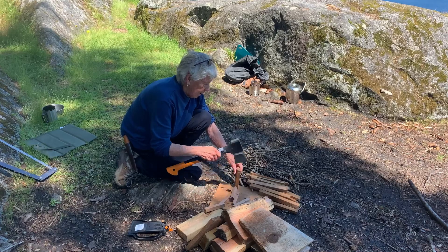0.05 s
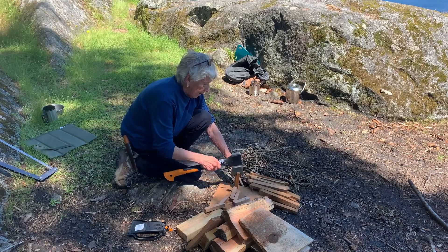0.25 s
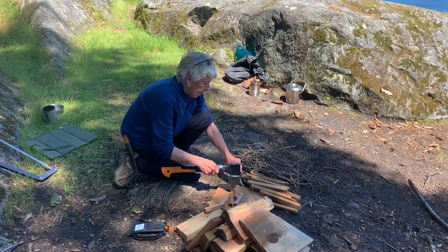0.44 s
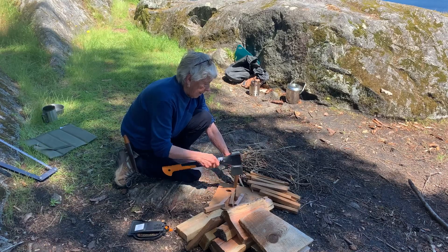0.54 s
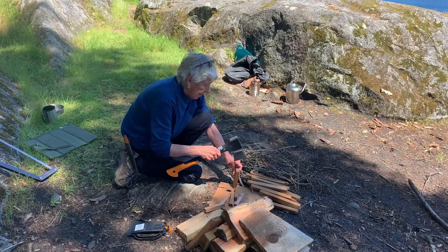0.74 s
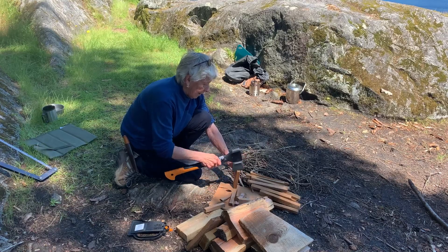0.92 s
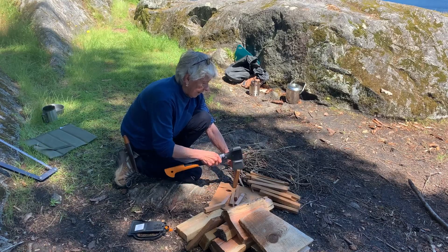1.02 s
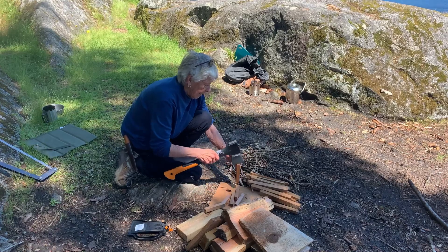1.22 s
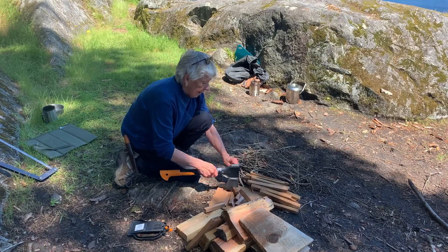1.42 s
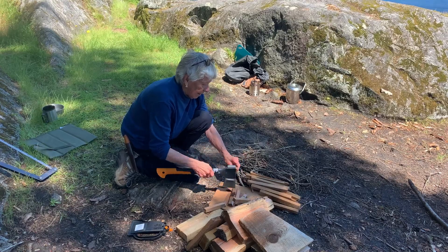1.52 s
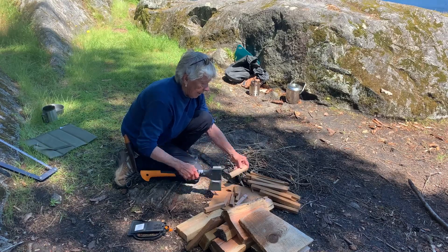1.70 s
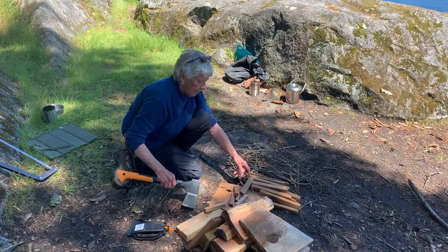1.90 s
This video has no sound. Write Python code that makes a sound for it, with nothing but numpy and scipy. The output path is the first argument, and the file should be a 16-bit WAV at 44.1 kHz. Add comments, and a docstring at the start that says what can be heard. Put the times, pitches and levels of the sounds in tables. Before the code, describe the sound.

Close stereo pickup of hatchet chops on dry sticks outdoors, stronger on the left. Hard woody clacks with short low ground thuds, a faint steel ring, light stick rattles, slight scattered echoes and a low far hum.

```python
"""Hatchet in dry kindling

A hatchet is tapped into dry kindling three times outdoors, close to two microphone ports. Split sticks
crack, bounce and clack on the wood pile: damped modes driven by rough contact noise, with treble snaps.
Each blow adds a falling thud through the ground, a rattle of small clacks and scattered echoes; steel
rings as a decaying sine. A far engine drones as low harmonics under quiet air made of shaped noise."""
import sys
import numpy as np
from scipy import signal
from scipy.fft import rfft, irfft
from scipy.io import wavfile
from scipy.ndimage import uniform_filter1d

SR = 44100
rng = np.random.default_rng(int(sys.argv[2]) if len(sys.argv) > 2 else 0)


def waveform_to_disk(signal):
    """Save audio, clipped to [-1, 1], as 16-bit WAV at the path in sys.argv[1]."""
    frames = np.transpose(np.atleast_2d(signal))
    scaled = np.clip(frames, -1, 1) * 32767
    samples = np.round(scaled).astype(np.int16)
    wavfile.write(sys.argv[1], SR, samples)


def how_loud(loudness_db):
    """Turn decibels into a plain amplitude multiplier (0 dB gives 1, 20 dB gives 10)."""
    steps = np.asarray(loudness_db, float) / 20
    return 10 ** steps


N = 85995


def evened(x):
    """Normalisation of power: scales to unit rms."""
    return x / np.sqrt(np.mean(x ** 2) + 1e-20)


def peaked(x):
    """Normalisation of amplitude: scales to unit peak."""
    return x / (abs(x).max() + 1e-20)


def read(points, hz):
    """Logarithmic frequency scale: interpolates a table along it."""
    f, value = np.transpose(points)
    return np.interp(np.log(hz + 1), np.log(f + 1), value)


def add(mix, s, sound):
    """Superposition: sums a sound into the mix from a time in seconds."""
    part = mix[round(s * SR):][:len(sound)]
    part += sound[:len(part)]


def coloured(x, points):
    """Linear filtering: multiplies the spectrum by a gain table in dB."""
    return irfft(rfft(x) * how_loud(read(points, np.fft.rfftfreq(len(x), 1 / SR))), len(x))


def hatchet():
    """Impact excitation: a blow sets off a blade clack, ground thud, crack, splinter spray and rattle."""
    # hatchet blows, levels ahead of the ports: time_s, clack_level_db, pitch_hz, thud_level_db, crack_level_db
    chops = [(.215, -1.5, 1373, -9.5, -15.5), (0.8017, -7.5, 903, -13.5, -24.5),
             (1.2469, -1, 1447, -10, -13.5)]
    clack_s, crack_s, crack_after_s = 0.01, 0.01, 0.002
    spray_s, spray_db, spray_lump_db = 0.08, -18, 2  # splinters keep crackling after a blow
    held = 0.4  # a held stick rings this share as long
    out = np.zeros(N)
    for s, db, hz, thud_db, crack_db in chops:
        add(out, s, how_loud(db) * clack(hz, clack_s, held, 0.5))
        add(out, s, how_loud(thud_db) * thud())
        add(out, s + crack_after_s, how_loud(crack_db) * snap(crack_s))
        add(out, s + crack_after_s, how_loud(crack_db + spray_db) * snap(spray_s, spray_lump_db))
        rattle(out, s, db)
    return out


def rattle(out, s, blow_db):
    """Decaying impact train: loose wood adds small clacks at jittered times after a blow."""
    per_s, start_db, t60_s = 70, -36, 0.5
    for gap in np.arange(1, 20) / per_s:
        jitter, size, pitch = rng.random(3)
        late = gap + jitter / per_s
        level_db = blow_db + start_db - 60 * late / t60_s - 10 * size
        add(out, s + late, how_loud(level_db) * clack(800 + 1500 * pitch, 0.0039))


def sticks():
    """Contact excitation: every touch of stick on wood is a clack with some snap on top."""
    # hard clacks, tearing and sliding of split sticks, levels ahead of the ports:
    # time_s, level_db, pitch_hz, treble_db (relative to the clack), contact_s (bursts limit it to 0.08)
    cracks = [(.284, -16, 1270, -15.5, 0.012), (0.293, -10, 1450, -20.5, 0.012),
              (0.303, 1, 1693, -11, .011), (0.3111, -0.5, 1810, -12, 0.0061),
              (0.317, -13.5, 1130, -27.5, 0.0054), (0.345, -22, 1400, -36, 0.0015),
              (.953, -18.5, 1890, -23, 0.0054), (1.267, -26.5, 2710, 3, 0.0091),
              (1.311, -29, 1270, -9, 0.052), (1.332, -17, 1290, -23.5, 0.0049),
              (1.366, -15.5, 1293, -24.5, 0.0068), (1.873, -37, 1560, -8.5, 0.094),
              (1.893, -25.5, 1660, -28, 0.0046), (1.903, -16.5, 1556, -25.5, 0.0085),]
    # soft taps of stick on wood, levels ahead of the ports: time_s, level_db, pitch_hz, contact_s
    knocks = [(.009, -26, 1440, 0.0057), (0.051, -26, 1160, 0.017), (0.165, -26, 1110, 0.0054),
              (0.327, -25, 1290, 0.0063), (0.429, -25.5, 1070, 0.0026), (0.488, -21.5, 1310, 0.0028),
              (0.854, -31, 1070, 0.0019), (0.871, -25, 850, 0.0051), (0.888, -22.5, 1300, 0.0068),
              (0.909, -33, 840, 0.0029), (0.988, -32, 1050, 0.0099), (1.027, -23, 1293, 0.011),
              (1.053, -34, 1200, 0.011), (1.238, -36.5, 1270, 0.0074), (1.309, -21.5, 920, 0.004),
              (1.392, -20, 1037, 0.0047), (1.556, -32, 1490, 0.0049), (1.654, -21, 1080, 0.0027),
              (1.691, -24.5, 980, 0.0097), (1.911, -22.5, 1410, 0.0027), (1.921, -26.5, 1120, 0.0029)]
    knock_treble_db = -42
    soft = [(s, db, hz, knock_treble_db, length) for s, db, hz, length in knocks]
    out = np.zeros(N)
    for s, db, hz, treble_db, length in cracks + soft:
        start = s - 0.001  # the rise leads the listed time
        add(out, start, how_loud(db) * clack(hz, length))
        add(out, start, how_loud(db + treble_db) * snap(length))
    return out


def clack(hz, length, damp=1, low=0.57):
    """Modal resonance: a contact rings the stick modes near its pitch centre, over a dull short body."""
    # modes of dry sticks before detuning and damping: pitch_hz, level_db, t60_s
    wood_modes = [(761, 0.5, 0.084), (1047.6, -3.5, 0.12), (1120, 8, 0.067), (1260, -1.5, 0.03),
                  (1528, 2.5, 0.034), (1602.3, 10, 0.053), (2262, 6, 0.025), (2590, 16, 0.026)]
    spread_oct, dull_db, dull_cycles = 0.83, -4, 5  # the dull body falls 60 dB in this many cycles
    high, top_hz = 2.35, 2703  # low and high edges are shares of the pitch centre
    octaves = np.log2(np.transpose(wood_modes)[0] / hz)
    near_db = -6 * (octaves / spread_oct)[:, None] ** 2
    body = peaked(ring(np.multiply(wood_modes, [1, 1, damp]), np.maximum(near_db, -22)))
    body += how_loud(dull_db) * peaked(ring([(hz, 0, dull_cycles / hz)]))
    edges = (low * hz, min(high * hz, top_hz))
    band = signal.butter(4, edges, "bandpass", fs=SR, output="sos")
    return peaked(signal.sosfilt(band, signal.fftconvolve(body, burst(length))))


def ring(modes, extra_db=0):
    """Modal superposition: exponentially dying sines, each a little detuned and of chance strength."""
    chance_db, detune = 2.5, 0.011  # standard deviations; detune is a share of the pitch
    hz, db, t60 = np.transpose(modes)[:, :, None]
    strength, offset = rng.standard_normal((2, len(modes), 1))
    t = np.arange(6144) / SR
    level_db = db + extra_db + chance_db * strength - 60 * t / np.maximum(t60, 0.004)
    return (how_loud(level_db) * np.sin(2 * np.pi * hz * (1 + detune * offset) * t)).sum(0)


def burst(length, lump_db=2.5):
    """Broadband contact noise: swells fast in lumps and dies within about the given seconds."""
    rise = 0.25  # share of the length
    u = np.arange(4096) / SR / np.clip(length, 3e-4, 0.08)
    noise, lumps = rng.standard_normal((2, 4096))
    roughness = how_loud(lump_db * evened(uniform_filter1d(lumps, size=40)))
    shape = np.sqrt(roughness * np.minimum(u / rise, 1) * np.exp(-2.5 * u ** 2))
    # half the envelope before evening the colour, half after it
    z = rfft(noise * shape)
    return shape * irfft(z / uniform_filter1d(abs(z), size=30))


def snap(length, lump_db=2.5):
    """Fracture noise: fibres snapping give a burst weighted towards the treble."""
    # colour of snapping fibres: pitch_hz, gain_db
    snap_colour = [(1800, -4.5), (3000, 5), (5000, -2.5), (6500, -13), (9500, -17), (16000, -28)]
    return peaked(coloured(np.pad(burst(length, lump_db), (32, 0)), snap_colour))


def thud():
    """Dispersion: soft ground passes treble first, so pitch falls as a power of time towards a floor."""
    peak_s, peak_hz, floor_hz = 0.0075, 300.5, 71.1  # pitch at the level's peak, and its floor
    fall, sharp = 1.6, 5.9  # exponents of the pitch fall and of the level
    tail_db, tail_t60_s = -22, 0.41
    t = np.arange(1, 6145) / SR
    u = t / peak_s
    hz = floor_hz + (peak_hz - floor_hz) * np.maximum(u, 0.3) ** -fall
    tail = how_loud(tail_db - 60 * t / tail_t60_s) * (1 - np.exp(-u ** 2))
    level = (u * np.exp(1 - u)) ** sharp + tail
    sweep = level * np.sin(2 * np.pi * (np.cumsum(hz) / SR + rng.random()))
    low_cut = signal.butter(3, 58, "highpass", fs=SR, output="sos")
    return peaked(signal.sosfilt(low_cut, sweep))


def drops():
    """Ground impact: a stick dropping on the ground sends the same falling thud through it."""
    # drops, levels ahead of the ports: time_s, level_db
    bumps = [(0.295, -31), (1.269, -30), (1.336, -35.5)]
    out = np.zeros(N)
    for s, db in bumps:
        add(out, s, how_loud(db) * thud())
    return out


def steel():
    """Damped vibration: steel rings as one decaying sine whose level wavers."""
    # rings, levels ahead of the ports: time_s, level_db (before decay and waver)
    rings = [(0.222, -28), (0.811, -28.5), (0.956, -33), (1.254, -25.5)]
    pitch_hz, t60_s, attack_s = 2690, 0.095, 0.00067
    out = np.zeros(N)
    t = np.arange(8192) / SR
    for s, db in rings:
        waver_db = 3 * evened(uniform_filter1d(rng.standard_normal(8192), 200))
        level = np.minimum(t / attack_s, 1) * how_loud(db + waver_db - 60 * t / t60_s)
        add(out, s, level * np.sin(2 * np.pi * pitch_hz * t))
    return out


def ports(x):
    """Interaural-style differences: the right port hears the wood shaded and shifted in phase."""
    # phase between the ports: pitch_hz, left_lead_rad
    phase_lead = [(1200, 1.03), (1800, -3), (5000, -1.5), (15800, -32)]
    # level between the ports: pitch_hz, left_minus_right_db
    shading = [(300, 1.5), (600, 2), (1200, 8), (2200, 17), (4500, 0.5), (14000, 5.5)]
    gain_db = 4.5  # for both ports
    hz = np.fft.rfftfreq(N, 1 / SR)
    f, lead = np.transpose(phase_lead)
    # below the first point the phase is proportional to frequency
    turn = np.exp(-1j * np.interp(hz, f, lead) * np.minimum(hz / f[0], 1))
    right = irfft(rfft(x) * how_loud(-read(shading, hz)) * turn, N)
    return how_loud(gain_db) * np.array([x, right])


def clearing(x):
    """Diffuse reverberation: scattered echoes from rocks and trees, with treble and bass decaying apart."""
    # decay of the echoes: pitch_hz, t60_s
    decay = [(200, 0.78), (1000, 0.49), (6000, 0.38)]
    echo_db, side_db = -21.5, [[2], [-3]]  # overall; left and right
    taps = np.zeros((2, SR // 2))
    at = np.arange(200, SR // 2 - 20, 20)
    at = at + rng.integers(0, 20, (2, len(at)))
    np.put_along_axis(taps, at, rng.choice([-1., 1.], at.shape), 1)
    hz, t, z = signal.stft(taps, SR, nperseg=256)
    dying = z * how_loud(-60 * t / read(decay, hz)[:, None])
    tail = signal.istft(dying, SR, nperseg=256)[1]
    tail = tail / np.linalg.norm(tail[0])
    echoes = signal.fftconvolve(x[None], tail, axes=1)[:, :N]
    return how_loud(echo_db) * echoes * how_loud(side_db)


def drone():
    """Harmonic series: low orders of a far engine share one wavering rate."""
    # engine orders: multiple of the base rate, level_db (rms)
    orders = [(4, -56.5), (5, -57), (6, -59)]
    base_hz, waver = 26.03, 0.013  # waver is an rms share of the rate
    drift = evened(uniform_filter1d(rng.standard_normal(N), 9000))
    turns = np.cumsum(base_hz * (1 + waver * drift)) / SR
    out = np.zeros(N)
    for k, db in orders:
        out += how_loud(db) * np.sqrt(2) * np.sin(2 * np.pi * (round(k) * turns + rng.random()))
    return out


def thin_tone():
    """Narrow-band noise: a one-pole resonance shifted up in frequency is heard as a faint thin tone."""
    # tone: pitch_hz, width_hz, level_db (rms)
    tones = [(5480, 50, -80)]
    t = np.arange(N) / SR
    out = np.zeros(N)
    for hz, width, db in tones:
        r = np.exp(-np.pi * width / SR)
        noise = rng.standard_normal(N) + 1j * rng.standard_normal(N)
        slow = signal.lfilter([1], [1, -r], noise)
        out += how_loud(db) * evened((slow * np.exp(2j * np.pi * hz * t)).real)
    return out


def air():
    """Partially coherent noise: a quiet outdoor wash with drifting patches."""
    # colour before the overall level is set: pitch_hz, relative_density_db (per Hz)
    air_colour = [(20, -7), (45, -4.5), (130, -7), (300, -20), (1250, -24.5), (1550, -22), (2000, -45),
                  (2700, -30), (3200, -50), (4900, -47.5), (5480, -34), (6000, -52), (8400, -62.5),
                  (10800, -46.5), (13300, -62), (15400, -64.5)]
    # likeness of the two sides: pitch_hz, coherence (0 to 1)
    likeness = [(60, 0.53), (380, 0.85), (2380, 0.028), (15000, 0.19)]
    # balance of the two sides: pitch_hz, left_minus_right_db
    balance = [(380, 2), (2380, 11.6), (15000, 0.5)]
    level_db, patch_db = -49, 0.56  # both rms
    frames, hz = N // 256 + 5, np.fft.rfftfreq(1024, 1 / SR)
    a, b, c, d, patches = rng.standard_normal((frames, 513, 5)).T
    patches = uniform_filter1d(uniform_filter1d(patches, 10, 0), 10, 1)
    patches = evened(patches)
    same = np.clip(read(likeness, hz), -1, 1)[:, None]
    left = a + 1j * b
    right = same * left + np.sqrt(1 - same ** 2) * (c + 1j * d)
    lean = read(balance, hz)[:, None] / 2
    gain_db = read(air_colour, hz)[:, None] + patch_db * patches + np.array([lean, -lean])
    z = np.array([left, right]) * how_loud(gain_db)
    wash = signal.istft(z, nperseg=1024, noverlap=768)[1][:, :N]
    return how_loud(level_db) * evened(wash)


def scene():
    """Superposition of direct wood and steel, their echoes, the drone and the air."""
    wood = hatchet() + sticks() + drops() + steel()
    return ports(wood) + clearing(wood) + drone() + thin_tone() + air()


def top_cut(x):
    """Nothing passes above the cut-off."""
    return signal.sosfilt(signal.butter(12, 16240, fs=SR, output="sos"), x)


def record(dry):
    """Band limitation and saturation: a low-pass filter, then clipping at full scale."""
    low_pass = signal.firwin(255, 16200, window=("kaiser", 9), fs=SR)  # edge in Hz
    x = signal.oaconvolve(dry, low_pass[None], "same")
    mix = np.clip(x, -1, 1)
    return top_cut(mix)


dry = scene()
out = record(dry)
waveform_to_disk(out)
```